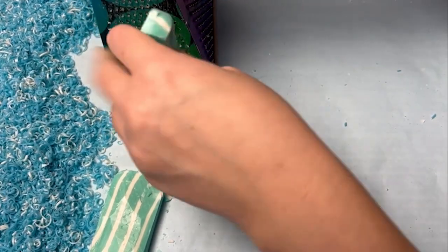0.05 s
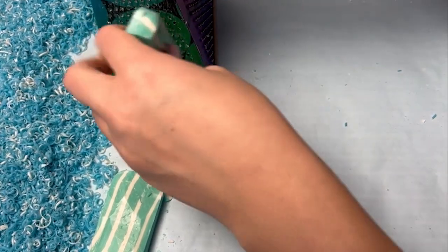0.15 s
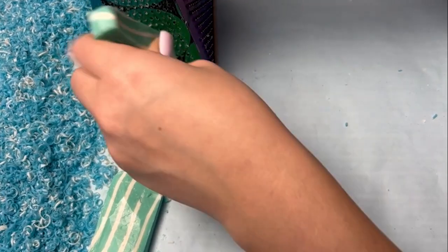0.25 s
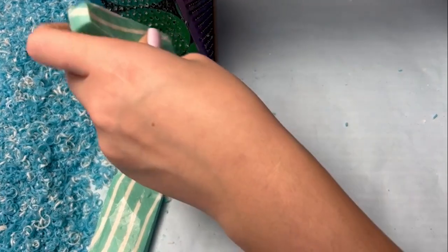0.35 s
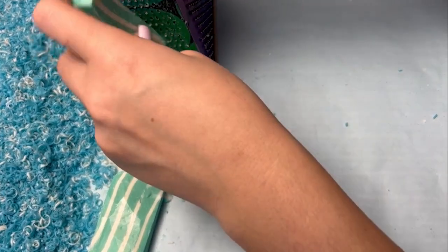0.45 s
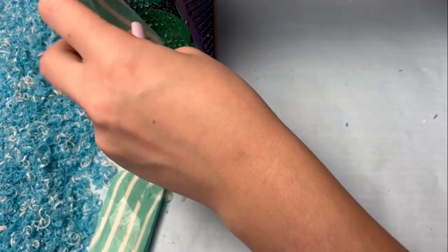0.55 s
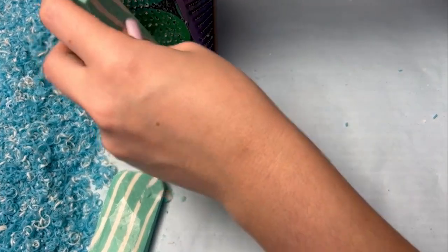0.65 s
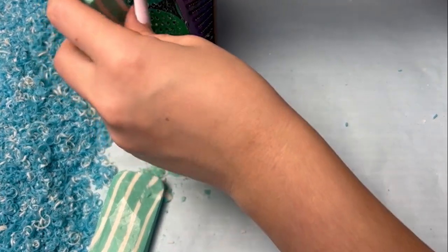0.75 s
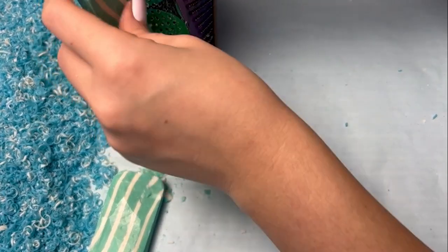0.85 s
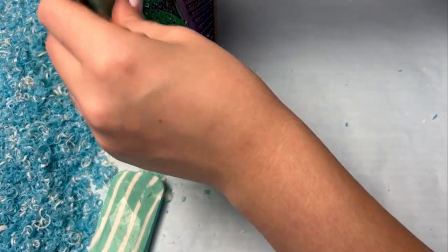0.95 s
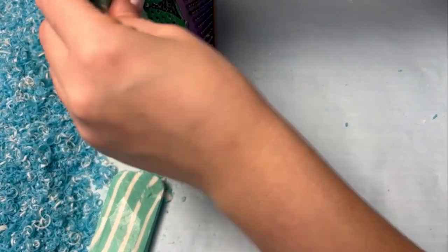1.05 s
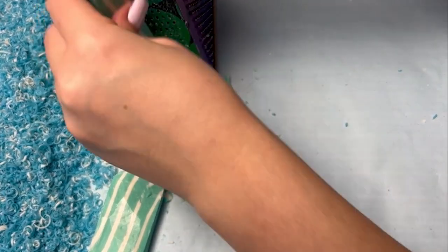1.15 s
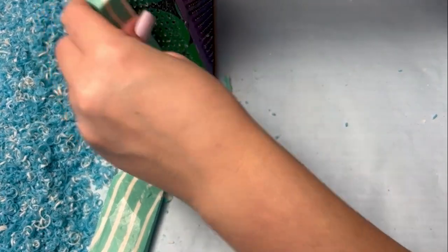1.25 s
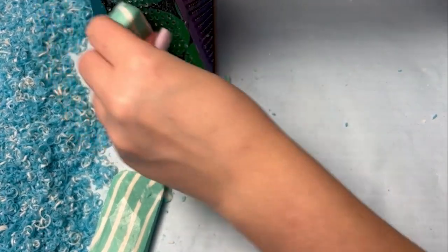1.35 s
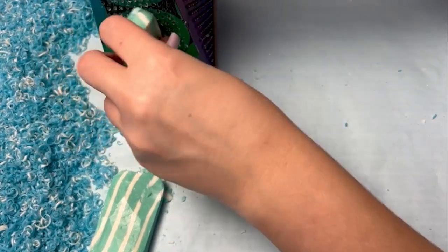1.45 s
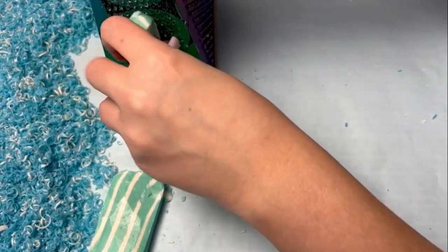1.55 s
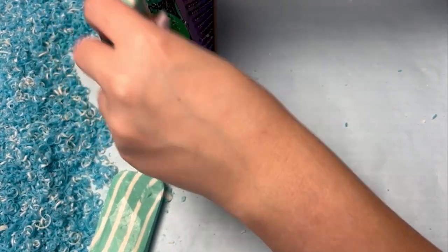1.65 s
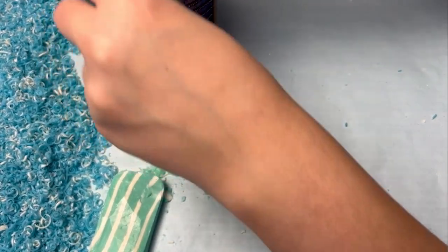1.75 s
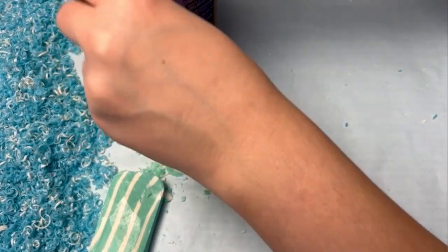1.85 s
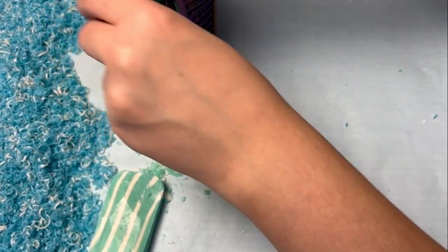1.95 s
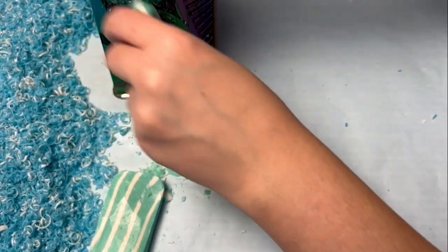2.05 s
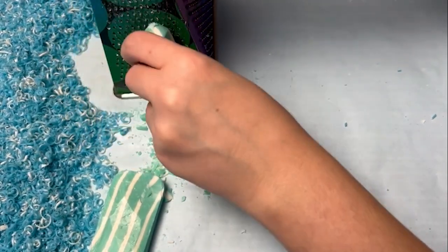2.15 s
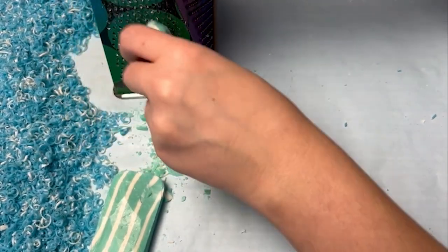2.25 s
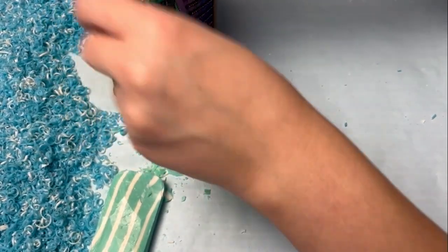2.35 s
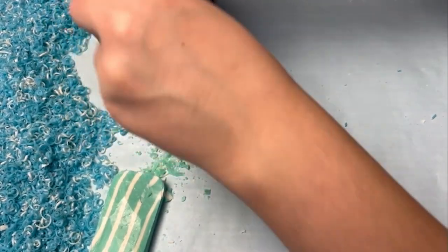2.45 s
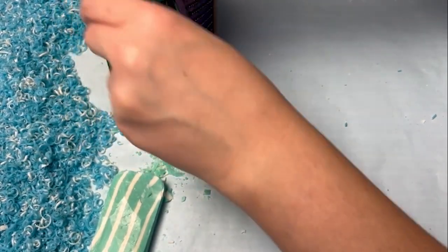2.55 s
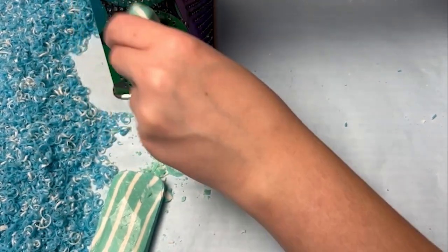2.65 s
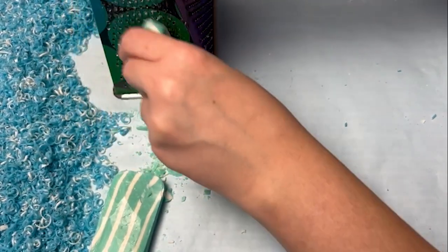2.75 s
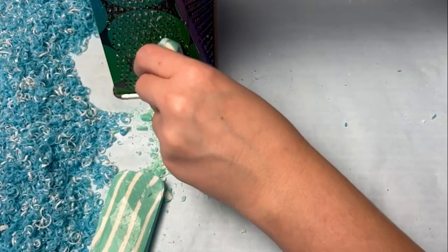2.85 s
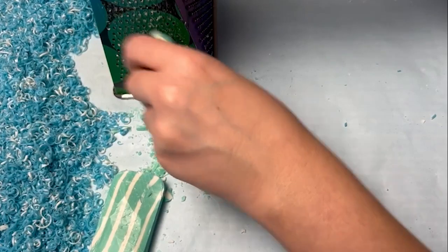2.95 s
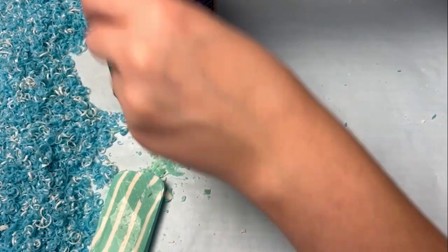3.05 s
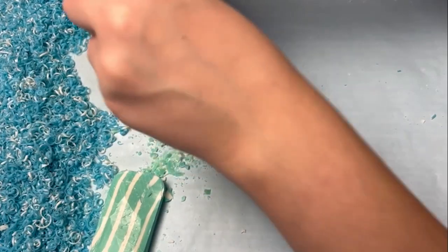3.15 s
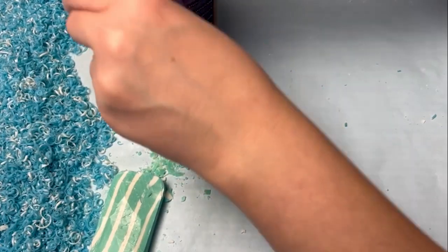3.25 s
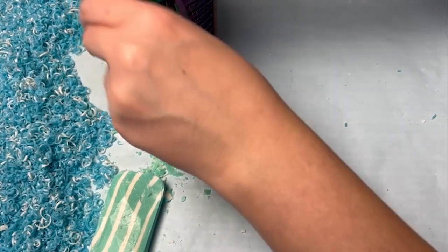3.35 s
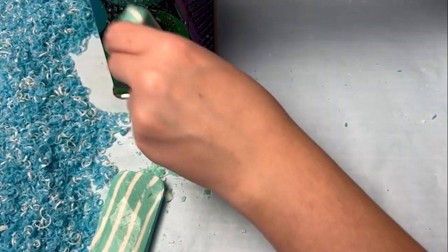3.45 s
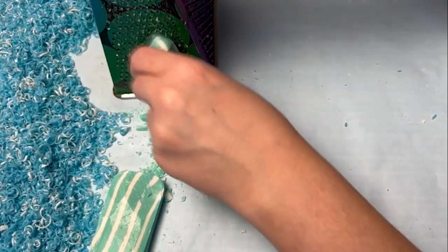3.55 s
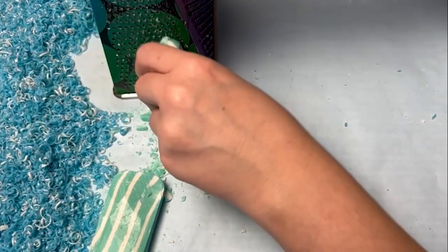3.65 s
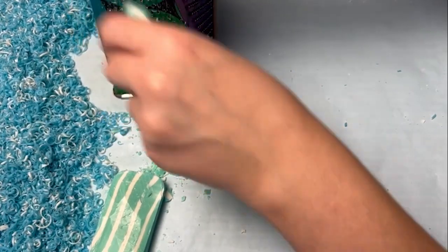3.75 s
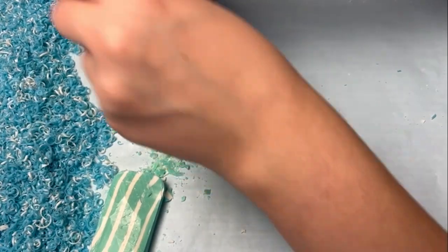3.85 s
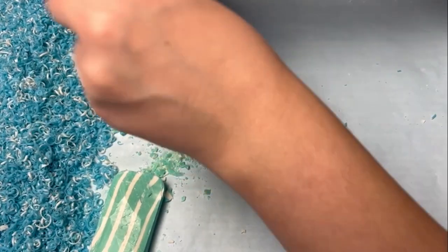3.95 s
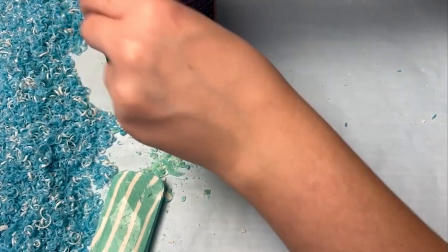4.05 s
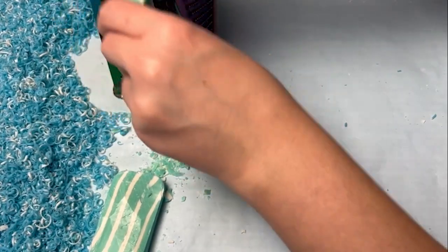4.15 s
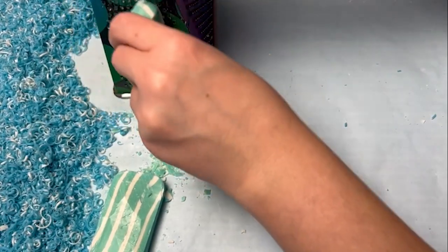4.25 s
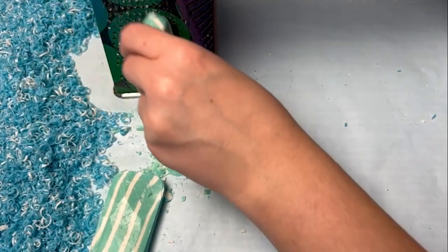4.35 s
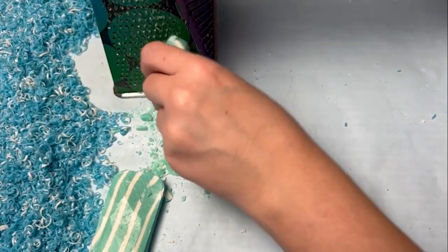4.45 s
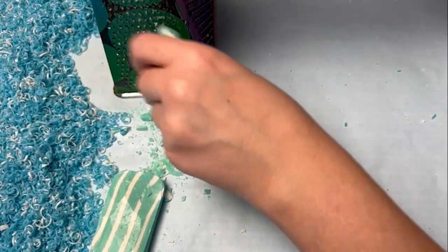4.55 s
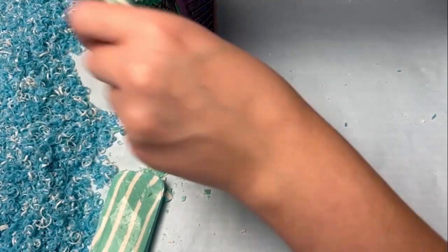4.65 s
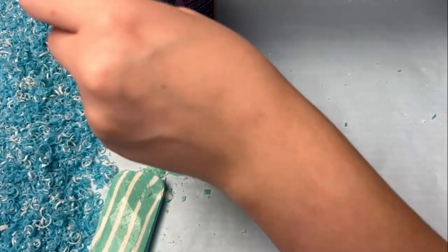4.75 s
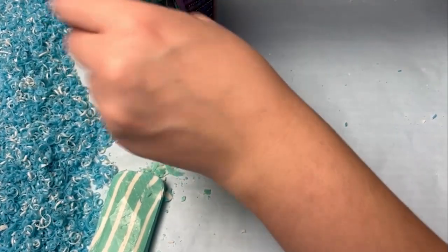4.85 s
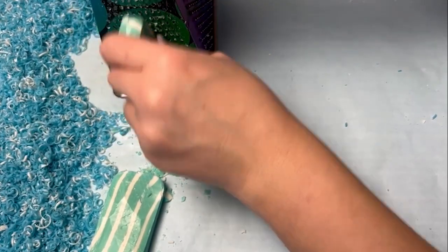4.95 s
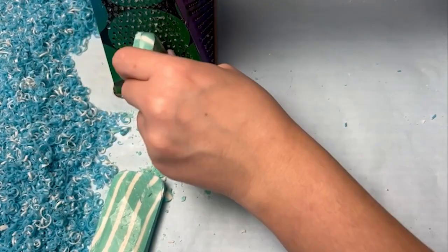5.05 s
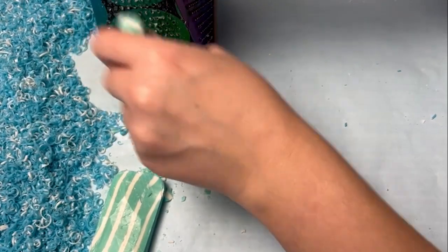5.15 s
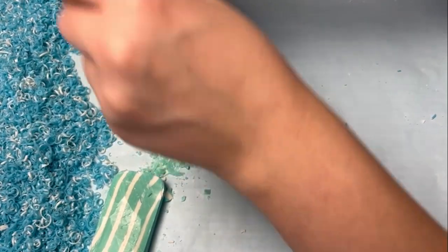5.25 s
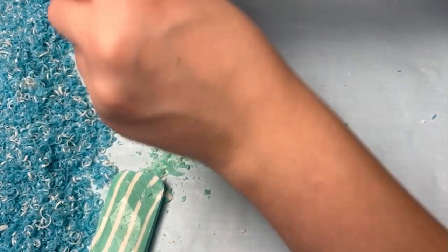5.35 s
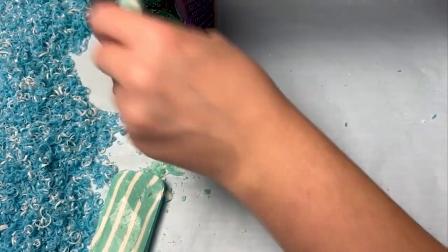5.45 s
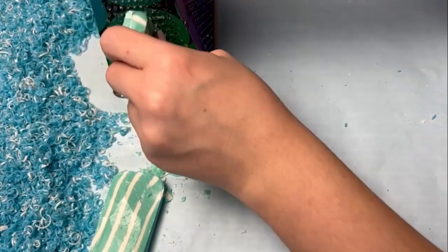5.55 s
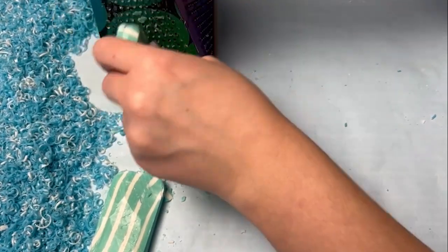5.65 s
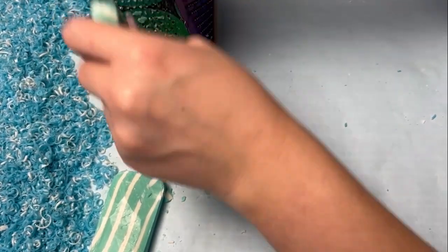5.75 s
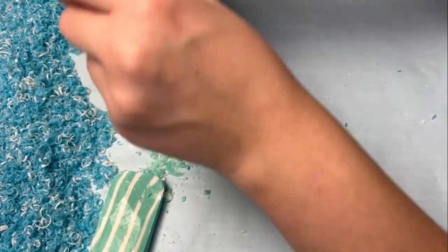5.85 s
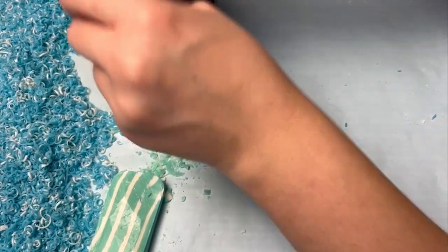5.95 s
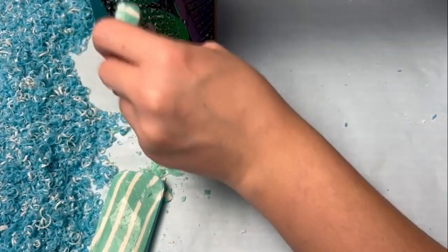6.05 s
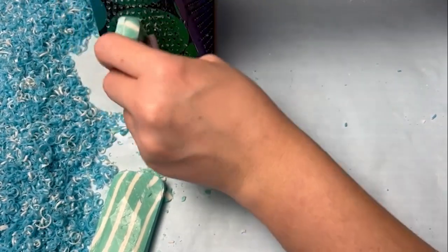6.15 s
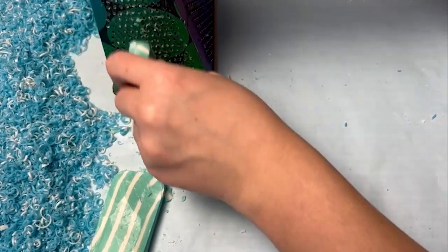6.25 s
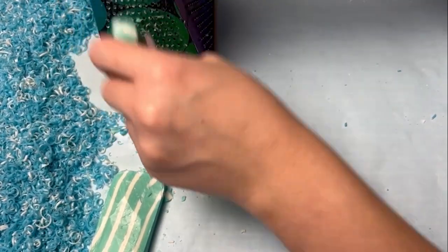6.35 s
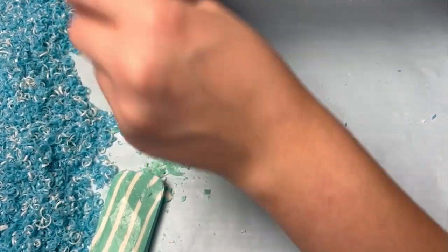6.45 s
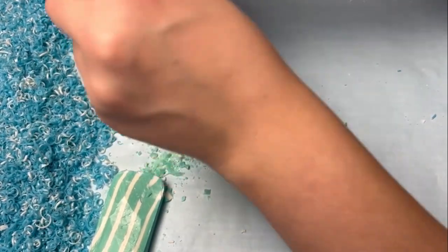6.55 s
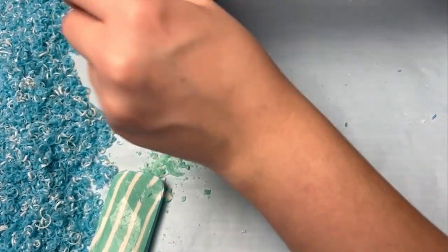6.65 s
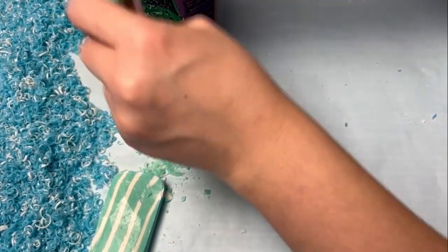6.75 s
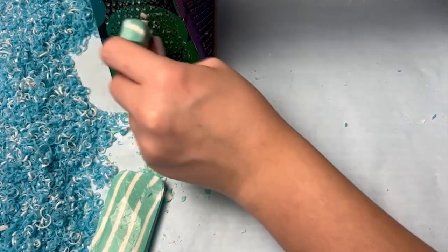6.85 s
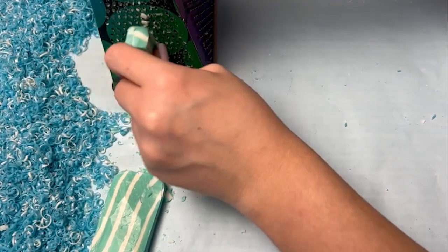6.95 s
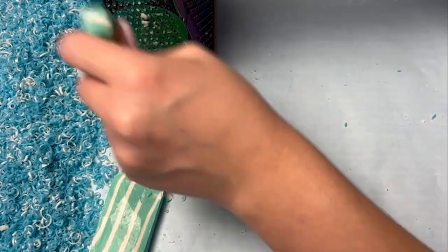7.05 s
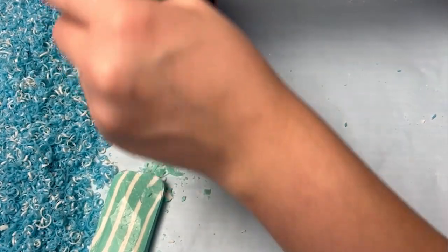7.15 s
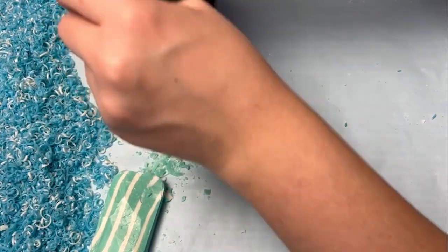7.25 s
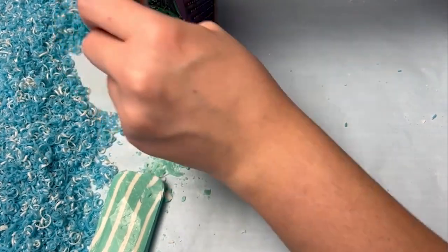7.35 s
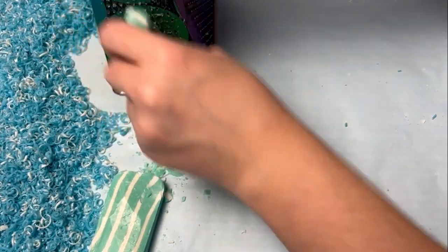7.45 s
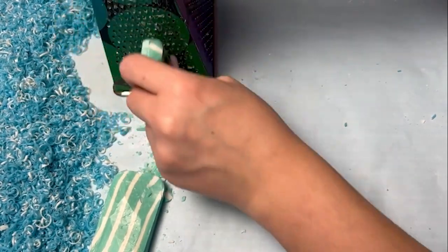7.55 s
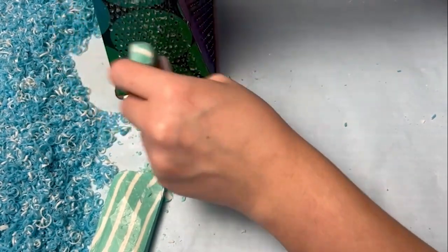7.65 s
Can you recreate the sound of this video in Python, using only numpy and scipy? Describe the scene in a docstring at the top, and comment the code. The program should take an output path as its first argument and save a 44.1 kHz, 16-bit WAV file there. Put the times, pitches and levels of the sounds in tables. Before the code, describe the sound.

A bar of soap is grated on a metal box grater standing on a table, close to a phone in a quiet room. From 0 to 1 s there are only faint touches, tiny ticks and a soft brush. Firmer scrapes arrive at 1.1 s and around 2 to 2.7 s, crunchy and stuttering, with a heavy hollow thump at 2.8 s. Strokes continue from 3 s, with a dense rasp from 3.8 to 4.05 s and the strongest bump, with a snap, near 4.4 s. A hard crunch comes at 4.85 s, a brief low rough groan at 5.15 s and a loud scrape with double thud at 5.4 s. After a lull, strokes return at 5.8 to 6 s; flakes snap at 6.1 s, bumps cluster at 6.6 to 6.8 s, and sharp rasps at 7.2 to 7.5 s close it. Steel and wood ring briefly throughout.

```python
"""At a table in a quiet room, a bar of soap is pushed to and fro over a metal box grater, close to a phone.
Uneven stick-slip pulses tear the soap: noise bursts knock the resonant steel sheet and crunch; flakes snap.
Jolts and thumps cross the table as falling chirps and leave the frame and the table ringing hollowly.
Decaying noise makes the ring of steel and table and the answer of the walls; faint coloured noise is the room."""
import sys
import numpy as np
from scipy import signal
from scipy.fft import rfft, irfft, next_fast_len
from scipy.io import wavfile
from scipy.ndimage import uniform_filter1d

SR = 44100
rng = np.random.default_rng(int(sys.argv[2]) if len(sys.argv) > 2 else 0)


def persist_wave(psi):
    """Save psi, clipped to +-1, as 16-bit WAV."""
    counts = np.round(np.clip(psi, -1, 1) * 32767).astype(np.int16)
    wavfile.write(sys.argv[1], SR, np.atleast_2d(counts).T)


N = 340011
T = np.arange(N) / SR

# modes of the steel sheet, damped by the soap: (frequency [Hz], width [Hz], relative level [dB])
SHEET_MODES = [(666, 59, -7.5), (896, 144, -0.5), (1038, 220, -2.5), (1298, 99, 2.5), (1614, 75, -0.5),
               (1744, 282, -4.5), (2163, 154, -2), (2685, 307, -7.5), (3520, 670, -14), (4360, 185, -23)]
# modes of the grater's frame on the table: (frequency [Hz], width [Hz], relative level [dB])
FRAME_MODES = [(167.6, 12, 4.5), (176.5, 9.7, 4), (267.6, 6.9, -14.5), (290.3, 18.8, 6.5), (289, 150, -6.5),
               (399.6, 29, -7), (511, 20, -16.5)]


def undb(db):
    """Decibels to gain."""
    return 10 ** (np.asarray(db) / 20)


def unit(x):
    """Scale to rms 1."""
    return x / np.sqrt(np.mean(x ** 2))


def steady(x, window_s):
    """Even out the level over a short window: the hand's pressure sets it."""
    return x / np.sqrt(uniform_filter1d(x ** 2, int(window_s * SR)) + 1e-9)


def smooth_noise(window_s):
    """Slowly varying noise of rms 1: white noise under a moving average."""
    return unit(uniform_filter1d(rng.standard_normal(N), int(window_s * SR)))


def band_pass(x, order, low_hz, high_hz):
    """Butterworth band-pass."""
    return signal.sosfilt(signal.butter(order, [low_hz, high_hz], "band", fs=SR, output="sos"), x)


def at_hz(points, hz):
    """Read (Hz, value) points on a log-frequency axis."""
    f, value = np.transpose(points)
    return np.interp(np.log(np.maximum(hz, 1)), np.log(f), value)


def convolve(x, response):
    """Pass x through a response scaled to unit energy."""
    return signal.fftconvolve(x, response / np.linalg.norm(response))[:N]


def colour(points, size=4096):
    """Minimum-phase response with the given spectrum, by folding the cepstrum."""
    log_gain = np.log(undb(at_hz(points, np.fft.rfftfreq(size, 1 / SR))))
    cepstrum = irfft(log_gain)
    cepstrum[1:size // 2] *= 2
    cepstrum[size // 2 + 1:] = 0
    return irfft(np.exp(rfft(cepstrum)))


def modes(table, size=12000):
    """Response of damped resonances; neighbours swing in opposite senses."""
    t = T[:size]
    response = 0
    for k, (hz, width_hz, db) in enumerate(table):
        decay = width_hz * np.exp(-np.pi * width_hz * t)
        response = response + (-1) ** k * undb(db) * decay * np.sin(2 * np.pi * hz * t)
    return response


def tail(t60_s, rise_s, size=40000):
    """Countless close modes: noise that builds up and dies away."""
    t = T[:size]
    decay = np.exp(-np.log(1000) * t / t60_s)
    return rng.standard_normal(size) * decay * (1 - np.exp(-t / rise_s))


def stroke_gains(size=22000, waver_db=3, waver_window_s=0.035):
    """Gains of rasp, crunch, shudder and rumble: the soap lands, presses harder or eases off, and lifts."""
    # one push or pull of the soap; levels at mid-stroke, ahead of waver and mixing:
    # (start [s], length [s], swell from start to end [dB], rasp [dB], crunch [dB],
    #  shudder of the frame [dB], rumble of the table [dB])
    strokes = [ (0.275, 0.025, 0, -77, -67, -52.5, -48), (0.841, 0.058, -6, -75, -91, -68, -53.5),
               (1.136, 0.065, 4, -56, -58, -45.5, -37), (1.238, 0.14, -11.5, -64.5, -63.5, -57.5, -45),
               (1.557, 0.023, 3, -68.5, -101, -67.5, -68), (1.781, 0.06, -7, -85, -79, -64, -64),
               (1.86, 0.054, -3, -76, -70, -51.5, -58), (1.912, 0.21, -3, -64, -64, -49, -57.5),
               (2.052, 0.12, -9, -57.5, -61, -45, -37), (2.275, 0.062, 11, -77, -66, -60, -53),
               (2.308, 0.036, 12, -56, -74, -42, -42), (2.44, 0.099, -8, -52, -56, -39, -38.5),
               (2.557, 0.12, -8.5, -59, -60.5, -42.5, -41.5), (2.729, 0.093, 27.5, -60.5, -59.5, -50, -53),
               (3.062, 0.049, 3, -54.5, -59, -46.5, -46), (3.191, 0.075, 0, -64, -60.5, -42.5, -69),
               (3.32, 0.075, 9, -62, -63.5, -53, -50), (3.394, 0.19, -4, -61.5, -57.5, -54.5, -46.5),
               (3.555, 0.014, 7.5, -51, -43.5, -47, -56), (3.816, 0.053, 14, -42.5, -54, -39.5, -50),
               (3.956, 0.079, -3.5, -51.5, -57, -39.5, -37), (4.074, 0.25, -17, -77, -69, -51, -49.5),
               (4.329, 0.099, 31, -64, -61, -56, -48), (4.729, 0.18, -12, -68, -76, -61.5, -55),
               (4.819, 0.016, 7, -45, -59, -37, -42), (4.841, 0.082, -6, -42.5, -45, -40, -31.5),
               (4.977, 0.025, 8, -50.5, -66, -44, -50), (5.14, 0.14, -3, -49.5, -61, -51.5, -70),
               (5.286, 0.13, -13, -71, -74.5, -50.5, -46.5), (5.393, 0.069, -6.5, -35.5, -39, -29, -25.5),
               (5.814, 0.063, -4, -48.5, -64, -44, -50), (5.895, 0.047, 11, -58, -71, -55, -55),
               (5.945, 0.14, -10, -46.5, -49.5, -34, -32), (6.184, 0.029, 3, -47.5, -54, -45, -40),
               (6.25, 0.048, -15, -92, -69, -78, -63), (6.483, 0.016, 5, -51, -92, -47.5, -64),
               (6.555, 0.037, 13, -76, -64, -57, -65), (6.587, 0.17, 0.5, -67, -68, -38.5, -34),
               (6.743, 0.073, -4.5, -43.5, -51, -29.5, -34.5), (6.858, 0.011, 19, -62, -61, -63, -49.5),
               (7.178, 0.074, -6, -54.5, -66, -37.5, -39.5), (7.278, 0.038, -6.5, -43.5, -47.5, -31, -32.5),
               (7.359, 0.066, 11, -61.5, -79, -47.5, -48), (7.427, 0.14, -20, -53.5, -54, -42, -36.5), ]
    # how rasp, crunch, shudder and rumble follow a stroke:
    # (lag [s], attack [s], release [s], share of the swell [ratio])
    follow = [(-.005, 0.0097, 0.002, 1.0), (-.005, 0.01, 0.004, 1.0), (-.002, .008, .01, .9),
              (.004, 0.02, 0.027, 1)]
    gains, t = np.zeros((4, N + size)), T[:size]
    for start_s, length_s, swell_db, *dbs in strokes:
        for gain, db, (lag_s, attack_s, release_s, share) in zip(gains, dbs, follow):
            lift = np.exp(-np.maximum(t - length_s, 0) / release_s)
            contact = np.minimum(t / attack_s, 1) * lift
            pressure_db = share * swell_db * (np.minimum(t / length_s, 1) - .5)
            start = int((start_s + lag_s) * SR)
            gain[start:start + size] += contact * undb(db + pressure_db)
    # the hand's pressure wavers, alike in all four
    return gains[:, :N] * undb(waver_db * smooth_noise(waver_window_s))


def slips(median_rate_hz, jitter, scatter_db, count=6000):
    """Stick-slip pulses: uneven gaps, uneven sizes."""
    gap, size = rng.standard_normal((count, 2)).T
    where = (np.cumsum(np.exp(jitter * gap)) / median_rate_hz * SR).astype(int)
    sizes = undb(scatter_db * np.clip(size, -2, 2))
    inside = where < N
    return np.bincount(where[inside], sizes[inside], N)


def grater(force, rasp, crunch):
    """Slips and catches knock the sheet over the denser crunch of the soap; flakes snap off."""
    # a tooth catches hard and lets go; levels ahead of mixing:
    # (time [s], knock level [dB], crunch level [dB], mid-glide pitch of the sheet there [Hz])
    hard_catches = [(0.184, -75, -63, 1900), (0.2786, -48, -66, 1340), (0.851, -62, -74, 1800),
                    (1.1433, -31.5, -75, 1420), (1.2485, -38.5, -37.5, 1340), (1.264, -41, -74, 1300),
                    (1.3475, -40, -61, 1190), (1.943, -43.5, -78, 1190), (2.005, -56, -59, 1280),
                    (2.0572, -29.5, -53, 1210), (2.074, -37, -49, 1240), (2.3381, -27, -45, 1290),
                    (2.343, -39, -93, 1850), (2.4299, -30.5, -57, 1730), (2.4508, -31, -43.5, 1330),
                    (2.4671, -27, -53, 1900), (2.48, -38, -56, 1800), (2.594, -38, -51, 1400),
                    (2.6165, -29, -62, 1100), (2.6409, -38, -53, 1140), (2.666, -40, -51, 1210),
                    (2.801, -41.5, -41, 1900), (3.0719, -34, -47.5, 2200), (3.1767, -47.5, -56, 1780),
                    (3.202, -51, -62, 1110), (3.241, -48, -60, 1330), (3.4096, -34.5, -69, 1260),
                    (3.481, -44, -49, 1850), (3.522, -41, -49, 1270), (3.817, -39, -67, 1270),
                    (3.8247, -31, -50.5, 1180), (3.836, -26.5, -67, 1270), (3.8475, -35.5, -47, 1330),
                    (3.871, -29, -46, 1430), (3.956, -42.5, -49, 880), (3.969, -33.5, -56, 1280),
                    (3.9814, -27, -38.5, 1300), (4.018, -34, -51, 1310), (4.042, -42, -71, 1300),
                    (4.136, -47, -60, 1270), (4.174, -51, -57, 1370), (4.208, -49.5, -57.5, 1400),
                    (4.364, -43.5, -69, 1420), (4.387, -35.5, -70, 1370), (4.4013, -27.5, -72, 2000),
                    (4.4288, -30, -30.5, 1360), (4.7375, -37, -64, 830), (4.829, -33, -76, 780),
                    (4.8435, -24, -39.5, 1350), (4.857, -34, -53, 1650), (4.8648, -22.5, -42, 2080),
                    (4.872, -36, -25.5, 2080), (4.879, -24, -38, 2100), (4.8888, -38, -32, 1500),
                    (5.006, -28, -48.5, 1255), (5.1801, -26.5, -47, 1220), (5.196, -22, -41, 1280),
                    (5.2035, -31, -54.5, 1020), (5.22, -44, -75, 860), (5.2365, -37, -73, 1170),
                    (5.255, -33, -72, 1500), (5.269, -32.5, -71, 900), (5.3905, -33, -54, 1160),
                    (5.402, -28, -48, 2000), (5.413, -27, -34, 1720), (5.42, -38, -49, 1190),
                    (5.436, -34, -41, 2200), (5.447, -29, -36, 1090), (5.6408, -47, -56.5, 1290),
                    (5.792, -30.5, -43.5, 2245), (5.799, -33.5, -53, 1430), (5.814, -29, -55, 1270),
                    (5.821, -29, -50, 1270), (5.832, -34, -53, 980), (5.8656, -24.5, -55, 1380),
                    (5.9499, -27.5, -56, 1380), (5.96, -26, -35.5, 2000), (5.9941, -22, -43, 2310),
                    (6.0, -36, -36.5, 1640), (6.019, -31.5, -47, 1170), (6.4911, -34, -59, 1360),
                    (6.5815, -28.5, -43.5, 1070), (6.62, -37, -70, 1220), (6.671, -39.5, -52, 1160),
                    (6.727, -36.5, -50, 1370), (6.7517, -29.5, -37, 890), (6.764, -26, -38.5, 910),
                    (6.7804, -30.5, -41, 1760), (6.787, -33, -37, 1100), (7.1787, -27.5, -50.5, 1270),
                    (7.2025, -30.5, -43.5, 1130), (7.243, -53, -54, 1160), (7.285, -23, -35, 1260),
                    (7.296, -32.5, -40, 1342), (7.318, -31, -43.5, 890), (7.434, -27.5, -37.5, 1400),
                    (7.453, -21, -40.5, 2160), (7.531, -40, -52, 1290)]
    # a dry flake snaps off: (time [s], level ahead of colouring and mixing [dB])
    flakes = [(0.1835, -50.5), (0.276, -54.5), (0.31, -52.5), (0.388, -59.5), (0.508, -78), (1.224, -45),
              (1.439, -54), (1.961, -54), (2.277, -59), (3.455, -39), (3.736, -52), (4.4269, -39.5),
              (6.101, -35.5), (6.111, -35), (6.2118, -38.5), (6.73, -40), (6.8551, -38), (6.87, -42.5),
              (7.316, -34.5)]
    # spectrum of torn soap: (frequency [Hz], relative level [dB])
    crunch_spectrum = [(500, -52), (1500, 2.5), (2400, 7), (2900, 9.5), (3900, -4.5), (4900, 3.5),
                       (6000, -9.5), (7000, -3), (8500, -6.5), (9500, -11), (11000, -11), (12500, -19)]
    # spectrum of a snapping flake: (frequency [Hz], relative level [dB])
    snap_spectrum = [(1000, -15), (3500, -12), (7000, -4.5), (11000, -3.5), (12500, -8.5)]
    time_s, knock_db, crunch_db, hz = np.vstack([hard_catches, snags(rasp, crunch)]).T

    scrape = tearing(force, decay_s=.002, drag=.25)
    crumble = tearing(force, decay_s=.003, drag=.9)
    knocks = undb(-1.5) * rasp * scrape
    knocks += undb(-7.5) * bursts(time_s, knock_db, decay_s=0.0041, rise_s=0.00017)
    cuts = undb(-4.0) * crunch * crumble
    cuts += undb(-2) * bursts(time_s, crunch_db, decay_s=0.0035, rise_s=0.00082)
    snaps = undb(-5.5) * bursts(*np.transpose(flakes), decay_s=0.00099, rise_s=0.0019)

    sheet = roaming_sheet(knocks, swing_db=2.2) + undb(-6.5) * pings(time_s, knock_db, hz) + groan()
    return sheet + convolve(cuts, colour(crunch_spectrum)) + convolve(snaps, colour(snap_spectrum))


def snags(rasp, crunch, count=260):
    """Small catches at random moments, as strong as the stroke is then; columns as for the hard catches."""
    place = rng.random(count)
    size, pitch = np.clip(rng.standard_normal((2, count)), -2, 2)
    at = ((np.arange(count) + place) / count * (N - 1)).astype(int)
    scatter_db = 3 * size
    knock_db = 20 * np.log10(rasp[at] + 1e-9) + scatter_db + 4.5
    crunch_db = 20 * np.log10(crunch[at] + 1e-9) + scatter_db - 6
    hz = 1404 * 2 ** (0.33 * pitch)  # spread in octaves
    return np.column_stack([T[at], knock_db, crunch_db, hz])


def tearing(force, decay_s, drag):
    """Each slip tears the soap for a moment; a little steady drag lies between."""
    grip = unit(signal.lfilter([1], [1, -np.exp(-1 / (decay_s * SR))], force))
    return steady((grip + drag) * rng.standard_normal(N), window_s=0.025)


def bursts(times_s, dbs, decay_s, rise_s, size=1500):
    """A short tearing burst of noise at each time."""
    t = T[:size]
    out = np.zeros(N + size)
    fade = np.exp(-t / decay_s) * (1 - np.exp(-t / rise_s))
    noises = rng.standard_normal((len(times_s), size))
    for time_s, db, noise in zip(times_s, dbs, noises):
        start = int(time_s * SR)
        out[start:start + size] += undb(db) * noise * fade / fade.max()
    return out[:N]


def roaming_sheet(knocks, swing_db):
    """As the soap travels it stands on crests or nodes of each resonance, so their shares keep changing."""
    marks_s = np.arange(0, T[-1] + 1, .04)
    shares, rings = [], []
    for k, mode in enumerate(SHEET_MODES):
        swing = np.interp(T, marks_s, rng.standard_normal(len(marks_s)))
        shares.append(undb(swing_db * swing))
        rings.append((-1) ** k * modes([mode]))
    energy = np.sum(np.array(rings) ** 2, axis=1) @ np.array(shares) ** 2
    ringing = sum(share * signal.fftconvolve(knocks, ring)[:N] for share, ring in zip(shares, rings))
    return ringing / np.sqrt(energy)


def pings(times_s, dbs, pitches_hz, rise_s=0.00086, decay_s=0.0016, sag=0.051, size=1500):
    """A caught tooth flicks the sheet: a few cycles that swell, sink in pitch and die."""
    out, t = np.zeros(N + size), T[:size]
    swell = (1 - np.exp(-t / rise_s)) * np.exp(-t / decay_s)
    # pitch ratio falls from 1 + sag to 1 - sag
    glide_s = np.cumsum(1 + sag * (2 * np.exp(-t / 0.00089) - 1)) / SR
    for time_s, db, hz in zip(times_s, dbs, pitches_hz):
        start = int(time_s * SR)
        out[start:start + size] += undb(db) * swell / swell.max() * np.sin(2 * np.pi * hz * glide_s)
    return out[:N]


def groan(jitter=0.0782, scatter_db=3):
    """Soap drags flat on steel in fast, nearly even slips: a low rough tone, its overtones in the sheet."""
    # course of the groan, ahead of jitter and mixing: (time [s], slip rate [Hz], level [dB])
    course = [(5.132, 496, -71), (5.138, 410, -33), (5.157, 370, -38.5), (5.172, 417, -32),
              (5.19, 395, -37), (5.222, 250, -41.5), (5.242, 190, -48.5)]
    time_s, rate_hz, db = np.transpose(course)
    wander, flutter = smooth_noise(0.00335), smooth_noise(0.00335)
    phase = np.cumsum(np.interp(T, time_s, rate_hz) * (1 + jitter * wander)) / SR
    pulses = np.diff(np.floor(phase), prepend=0)  # one per cycle
    overtones = unit(convolve(pulses, modes(SHEET_MODES[:4])))
    tone = np.sqrt(2) * np.sin(2 * np.pi * phase) + undb(-5.0) * overtones
    level = np.interp(T, time_s, undb(db), left=0, right=0)
    return undb(-11.0) * tone * undb(scatter_db * flutter) * level


def slide(start_s=0.91, length_s=0.11, db=-82, flutter_db=2):
    """Between two early strokes the soap slides lightly over the steel: a soft, uneven brushing."""
    swell = np.sin(np.pi * np.clip((T - start_s) / length_s, 0, 1)) ** .5
    rub = band_pass(rng.standard_normal(N), order=2, low_hz=1700, high_hz=3800)
    return undb(db + flutter_db * smooth_noise(0.0077)) * swell * unit(rub)


def steel_ring(steel, rise_s=0.0014):
    """The box rings on as a bright wash, each register at its own level and length."""
    # free treble modes outlast the lowest, which the soap damps:
    # (low edge [Hz], high edge [Hz], relative level [dB], t60 [s])
    registers = [(200, 820, -4.5, 0.24), (1014, 1533, -12, 0.27), (1490, 3600, -10, 0.38),
                 (2636, 5800, -6.5, 0.5), (5730, 10800, -6.5, 0.39)]
    response = 0
    for low_hz, high_hz, db, t60_s in registers:
        ring = tail(t60_s, rise_s)
        ring /= np.linalg.norm(ring)
        response = response + undb(db) * band_pass(ring, 4, low_hz, high_hz)
    return signal.fftconvolve(steel, response)[:N]


def bending_wave(points, top_hz, lag_at_100_hz_s=0.0194, size=8192):
    """Bending waves cross the table, high ones first: a blow arrives as a quick falling chirp and fades."""
    hz = np.fft.rfftfreq(size, 1 / SR)
    travel = np.exp(-4j * np.pi * lag_at_100_hz_s * np.sqrt(100 * hz))  # delay goes as 1 / sqrt(hz)
    roll_off = np.hypot(1, (hz / top_hz) ** 6)
    wave = irfft(undb(at_hz(points, hz)) * travel / roll_off)
    return wave * np.hanning(2 * size)[size:] * (1 - np.exp(-T[:size] / 0.0023))


def table(shudder, rumble):
    """The grater judders under the hand: each jolt runs through the table and rings the frame."""
    # spectrum of a jolt, ahead of the roll-off: (frequency [Hz], relative level [dB])
    jolt_spectrum = [(90, -37), (160, 10), (230, -1), (300, -5), (480, -6), (700, -13.5), (1000, -28),
                     (2000, -36)]
    # spectrum of the table's rumble, ahead of the roll-off: (frequency [Hz], relative level [dB])
    rumble_spectrum = [(20, -18), (40, -16), (58, 6.5), (78, 0.5), (104, 4), (135, -18.5), (190, -41),
                       (400, -50)]
    judder = slips(median_rate_hz=90, jitter=.45, scatter_db=5.5)
    jolts = convolve(judder, bending_wave(jolt_spectrum, top_hz=920))
    frame_ring = convolve(judder, modes(FRAME_MODES))
    frame = steady(jolts + undb(-2.5) * frame_ring, window_s=0.04)
    boards = steady(convolve(judder, bending_wave(rumble_spectrum, top_hz=392)), window_s=0.057)
    return undb(-6.5) * shudder * frame + undb(-6.5) * rumble * boards


def thumps(return_s=0.01244):
    """The grater bumps the table; the wave returns from the edges as a hollow ringing."""
    # bumps: (start of the wave [s], peak level ahead of ringing [dB], treble corner [Hz])
    bumps = [(1.865, -41, 280), (2.322, -42, 417), (2.477, -31.5, 187), (2.807, -18, 653),
             (3.191, -44, 452), (3.231, -45, 484), (3.561, -24, 373), (3.973, -33.5, 330),
             (4.4208, -15.5, 677), (5.395, -27, 347), (5.413, -25.5, 340), (5.956, -32, 410),
             (5.978, -25.5, 405), (6.201, -57, 161), (6.575, -27, 282), (6.613, -29.5, 282),
             (6.722, -28.5, 304), (6.772, -21.5, 193)]
    # spectrum of a bump, ahead of the roll-off: (frequency [Hz], relative level [dB])
    bump_spectrum = [(20, -33), (45, -15), (65, 1), (102, 1.5), (135, -4), (165, -0.5), (230, -6.5),
                     (290, -3), (450, -7), (700, -15), (1500, -18)]
    # ringing left in the table: (frequency [Hz], width [Hz], relative level [dB])
    hollow_modes = [(61.7, 8.4, -7), (102.3, 14, -3.5), (158, 7.7, -1.5), (210.4, 7.1, -8),
                    (249.4, 4, -5.5), (291, 9.6, -3.5), (353, 10, -13), (391, 12, -6), (436, 18, -9),
                    (507, 12, -8), (580, 16, -5), (695, 28, 2.5)]
    out = np.zeros(N)
    for time_s, db, top_hz in bumps:
        start = int(time_s * SR)
        wave = bending_wave(bump_spectrum, top_hz, lag_at_100_hz_s=.0225)[:N - start]
        out[start:start + len(wave)] += undb(db) * wave / np.abs(wave).max()
    ring = signal.fftconvolve(out, modes(hollow_modes, size=24000))[:N] * 2 * np.pi / SR
    return out + undb(3.0) * np.interp(T - return_s, T, ring, left=0)


def wood_ring(judder, bumps):
    """Table and frame ring on: a noise tail of many modes, and faintly the frame's own modes."""
    table_ring = convolve(judder + undb(-6) * bumps, tail(t60_s=0.31, rise_s=0.003))
    return undb(-6.0) * table_ring + undb(-25.0) * convolve(judder, modes(FRAME_MODES))


def ports(x):
    """The phone's two ports hear the same sound with a phase between them that depends on pitch."""
    # phase between the ports: (frequency [Hz], lead of the left [rad])
    lead = [(20, 0), (100, -.12), (350, -.3), (900, -.6), (1900, .2), (2250, 1.1), (2550, 2.8), (3300, 2),
            (4000, .6), (5100, 1.6), (5700, 3.1), (6600, 3.4), (7400, 6.1), (8850, 6.5), (9750, 9.4),
            (10900, 9.5), (12000, 12.2)]
    size = next_fast_len(N + 4096)
    turn = np.exp(.5j * at_hz(lead, np.fft.rfftfreq(size, 1 / SR)))
    spectrum = rfft(x, size)
    return np.array([irfft(spectrum * turn, size)[:N], irfft(spectrum / turn, size)[:N]])


def wall_echo(steel, judder, bumps):
    """The walls answer in a separate noise tail for each ear, strongest near 500 Hz, bass well below that."""
    # spectrum the walls send back: (frequency [Hz], relative level [dB])
    wall_spectrum = [(50, -4.5), (250, -3.5), (520, 14.5), (1000, 6.5), (2300, -5), (4000, 5.5),
                     (9000, -3.5)]
    sent = undb(-7) * steel + undb(-12) * judder + undb(-15) * bumps
    far = convolve(sent, colour(wall_spectrum))
    return np.array([convolve(far, tail(t60_s=0.2, rise_s=0.0001)) for _ in range(2)])


def room_tone(mid_db=-68, side_db=-9, alike_below_hz=250):
    """Faint steady air of the room: coloured noise whose bass is nearly the same in both ears."""
    # spectrum of the room: (frequency [Hz], relative level [dB])
    room_spectrum = [(20, -26), (50, -1), (120, -5.5), (200, -4), (300, -11), (420, -22), (540, -10.5),
                     (660, -19), (800, -20), (1050, -16), (1200, -20), (1500, -21), (2000, -33.5),
                     (2450, -29.5), (3100, -44), (5000, -43.5), (6200, -55), (8500, -48.5), (12000, -57)]
    mid, side = (convolve(rng.standard_normal(N), colour(room_spectrum)) for _ in range(2))
    side = signal.sosfilt(signal.butter(1, alike_below_hz, "high", fs=SR, output="sos"), side)
    return undb(mid_db) * (mid + undb(side_db) * np.array([side, -side]))


def scene():
    """Steel, frame and table sound and ring on through the ports; walls and room are added."""
    rasp, crunch, shudder, rumble = stroke_gains()
    force = slips(median_rate_hz=115, jitter=.55, scatter_db=4.5)
    steel = grater(force, rasp, crunch) + slide()
    judder, bumps = table(shudder, rumble), thumps()
    near = steel + judder + bumps + steel_ring(steel) + wood_ring(judder, bumps)
    return ports(near) + wall_echo(steel, judder, bumps) + room_tone()


def record(dry):
    """The phone cuts the top: a steep elliptic low-pass at 11.7 kHz."""
    return signal.sosfilt(signal.ellip(10, .2, 70, 11700, fs=SR, output="sos"), dry)


dry = scene()
out = record(dry)
persist_wave(out)
```